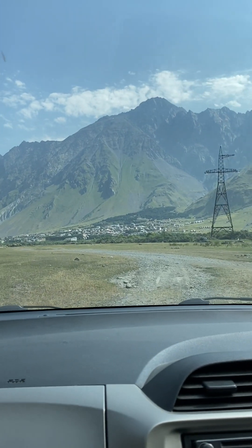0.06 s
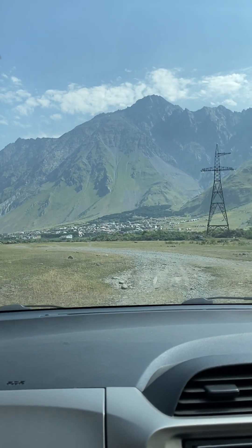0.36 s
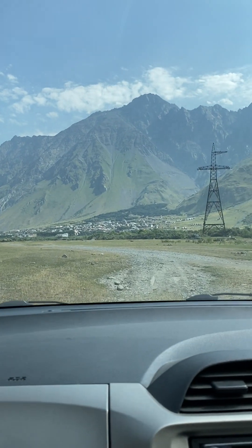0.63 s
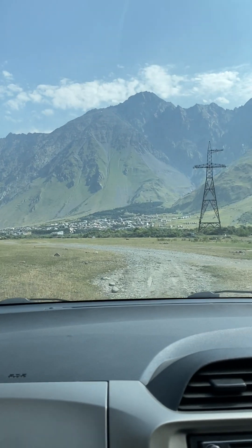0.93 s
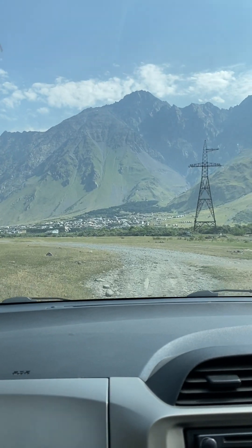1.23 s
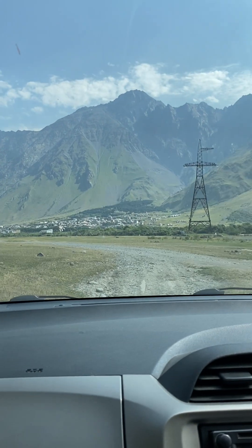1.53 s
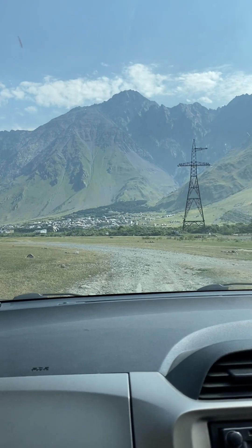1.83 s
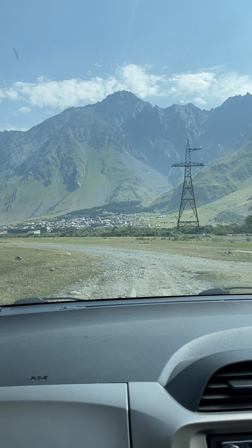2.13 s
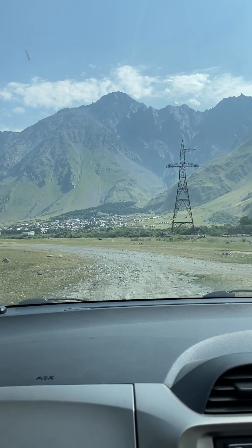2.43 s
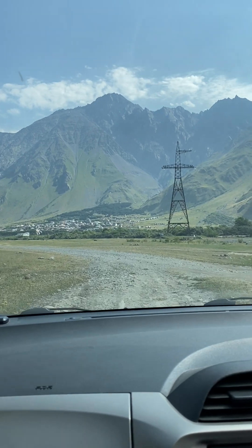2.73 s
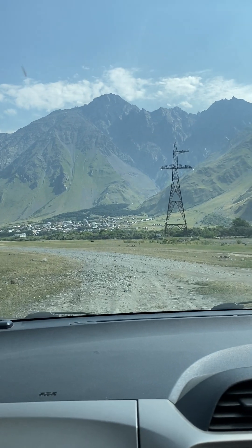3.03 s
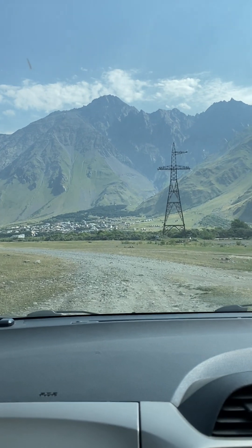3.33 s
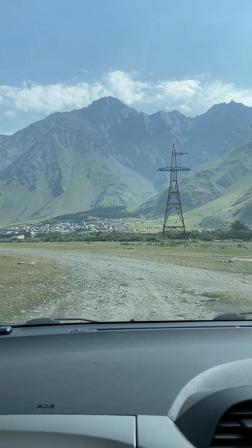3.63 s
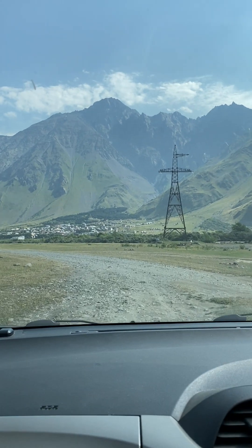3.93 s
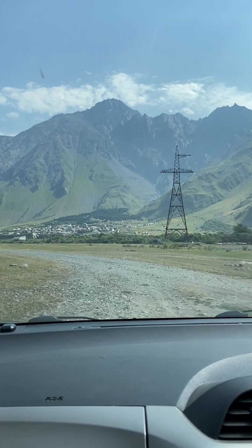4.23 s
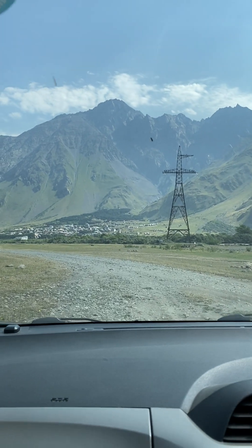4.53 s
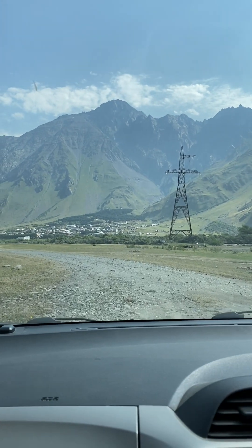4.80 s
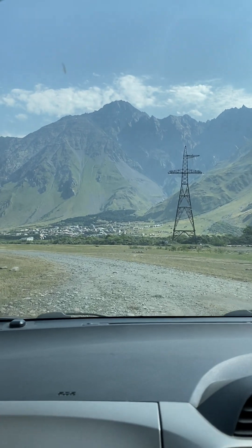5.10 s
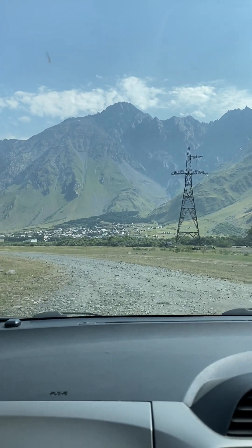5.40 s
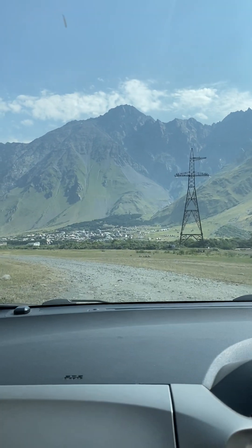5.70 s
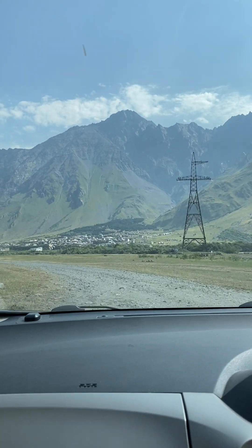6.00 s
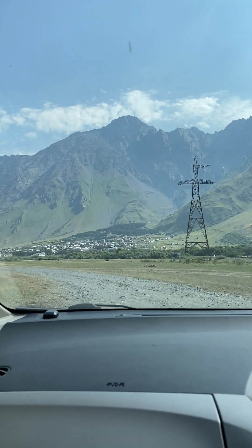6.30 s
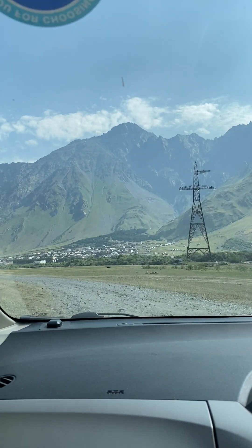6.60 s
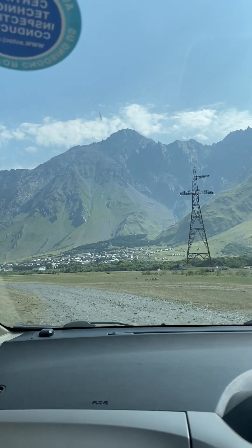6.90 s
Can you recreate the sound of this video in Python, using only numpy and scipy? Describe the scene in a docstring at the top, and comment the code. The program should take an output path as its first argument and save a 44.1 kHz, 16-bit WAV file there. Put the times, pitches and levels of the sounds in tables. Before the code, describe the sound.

A car creeps along a rough gravel track, heard from inside as low rumble, engine drone, stone knocks, jolts and small rattles.

```python
"""Inside a car rolling slowly along a gravel track.
From the start the wheels shake the cabin into a deep boom over the engine's hum and thin whines; gravel
crunches under the tyres and stones knock through the floor. A soft hiss fades and stops near 2.3 s, as
jolts ring the body. Plastic trim ticks and squeaks; brief rustles follow. A faint, high squeal passes
at 4.2-4.6 s, then the track turns rougher and the boom grows."""
import sys
import numpy as np
from scipy import signal
from scipy.fft import rfft, irfft, next_fast_len
from scipy.io import wavfile
from scipy.ndimage import uniform_filter1d

SR = 44100
rng = np.random.default_rng(int(sys.argv[2]) if len(sys.argv) > 2 else 0)


def file_out(sig):
    """Save sig as 16-bit WAV at sys.argv[1]."""
    # one column per channel
    cols = np.atleast_2d(sig).T
    # limit, then scale
    lim = np.clip(cols, -1, 1)
    pcm = np.round(lim * 32767).astype(np.int16)
    wavfile.write(sys.argv[1], SR, pcm)


N = 306495

# spectrum of hiss and rustles: freq_hz, density_db
HISS_SPECTRUM = [(700, -10.5), (1500, 1.5), (2400, 1), (3700, 2), (4800, 3), (6000, -1), (8000, -5.5),
                 (10500, -3.5), (13000, -9), (15800, -15)]


def from_db(db):
    """Decibels to gain."""
    return 10 ** (np.asarray(db) / 20)


def unit_rms(x):
    """Scale to rms 1."""
    return x / np.sqrt(np.mean(x ** 2) + 1e-20)


def unit_burst(x):
    """Scale a short stereo sound to unit power over 23 ms."""
    return x / np.sqrt(np.sum(x ** 2) / 2 / (.023 * SR))


def evened(x, span_s):
    """Flatten swells slower than the span."""
    power = uniform_filter1d(np.mean(x ** 2, axis=0), max(int(span_s * SR), 2))
    return x / np.sqrt(power + 1e-9)


def curves(rows):
    """Interpolate each column after time_s to N samples."""
    time_s, *columns = np.transpose(rows)
    return [np.interp(np.arange(N) / SR, time_s, column) for column in columns]


def at_hz(points, hz):
    """Read a table on a log-frequency axis."""
    freq_hz, values = np.transpose(points)
    return np.interp(np.log(hz + 1), np.log(freq_hz + 1), values)


def bins_hz(size):
    """Frequencies of a real spectrum."""
    return np.arange(size // 2 + 1) * SR / size


def band(hz, width_oct):
    """Band edges around a pitch, at least 0.2 octave apart."""
    ratio = 2 ** (max(width_oct, .2) / 2)
    return [hz / ratio, hz * ratio]


def butter(x, hz, kind, order=2):
    """Causal Butterworth filter."""
    sos = signal.butter(order, np.clip(hz, 10, .45 * SR), kind, fs=SR, output="sos")
    return signal.sosfilt(sos, x + 1e-18)


def drift(rate_hz):
    """Slow random curve, rms 1."""
    hop = 40
    pole = np.exp(-2 * np.pi * rate_hz * hop / SR)
    noise = rng.standard_normal(N // hop + 2002)
    slow = signal.lfilter([1], [1, -2 * pole, pole * pole], noise)[2000:]
    return np.interp(np.arange(N) / hop, np.arange(len(slow)), unit_rms(slow))


def add(out, start_s, sound):
    """Mix a sound in at a time."""
    i = int(np.clip(start_s * SR, 0, N - 1))
    out[:, i:i + sound.shape[-1]] += sound[..., :N - i]


def grains(per_s, spread_db):
    """Two trains of random clicks of uneven size."""
    sizes = from_db(spread_db * np.minimum(rng.exponential(1, (2, N)), 4))
    signs = rng.choice([-1, 1], (2, N))
    return unit_rms(sizes * signs * (rng.random((2, N)) < per_s / SR))


def contact(crack_t60_s, tail_t60_s, tail_db, width=.4):
    """A short stereo crack, then dense cabin reflections dying away."""
    t = np.arange(SR // 5) / SR
    decay = from_db(-60 * t / crack_t60_s) + from_db(tail_db - 60 * t / tail_t60_s)
    attack = (1 - np.exp(-t / 0.002)) ** 2
    mid, side = rng.standard_normal((2, len(t))) * decay * attack
    return mid + width * side * np.array([[1], [-1]])


def cabin_field(pair, spectrum):
    """Colour two unrelated signals and mix them to left and right, alike in the bass; rms 1."""
    # left-right likeness: freq_hz, coherence
    likeness = [(125, 1), (250, .99), (500, 0.78), (1000, 0.66), (2000, 0.72), (4000, 0.65), (8000, 1),
                (14000, 0.31)]
    size = next_fast_len(N + SR // 2)
    hz = bins_hz(size)
    rolloff = np.sqrt(1 + (hz / (2 * spectrum[-1][0])) ** 8)
    mid, side = rfft(pair, size) * from_db(at_hz(spectrum, hz)) / rolloff
    coherence = np.clip(at_hz(likeness, hz), 0, 1)
    stereo = np.sqrt(1 + coherence) * mid + np.sqrt(1 - coherence) * side * [[1], [-1]]
    return unit_rms(irfft(stereo, size)[:, :N])


def boom(lift_db):
    """The sprung body pumps the cabin air, which booms in its lowest modes."""
    # body shake from track roughness: time_s, level_db
    shake = [(0.0, -27.5), (0.11, -28.5), (4.63, -29), (4.69, -24.5), (5.4, -25.5), (5.96, -26),
             (6.05, -27), (6.9, -23)]
    # cabin air modes: freq_hz, density_db
    spectrum = [(22, -13), (32, -1.5), (41, -8.5), (55, 1), (65, 1), (76, -2), (88, -9.5), (105, -19.5),
                (140, -31)]
    shake_db, = curves(shake)
    air = evened(cabin_field(rng.standard_normal((2, N)), spectrum), span_s=0.058)
    return from_db(shake_db + lift_db + 0.26 + 0.57 * drift(5.9)) * air


def bumps():
    """Bumps and crests swell or dip boom and rumble, in dB; the springs' rebound reverses each."""
    # bumps and crests: time_s, boom_db, rumble_db
    crossings = [(0.334, -1, 4.5), (0.57, -1.5, 2), (0.85, 1, 1.5), (1.641, 3, 3.5), (2.0, 0.5, 1),
                 (2.22, -2, 1), (2.52, 3, 6.5), (3.51, 3.5, -5.5), (3.831, -4, -2), (4.011, 6.5, 6),
                 (4.28, 1.5, 2), (4.76, 4.5, 2), (5.18, 3.5, -2), (5.329, 5.5, 3), (5.421, 7, -2.5),
                 (5.47, 0.5, 6.5), (5.7, -1.5, -4.5), (5.96, 1, 4.5), (6.231, 3, 2), (6.329, -2, 3.5),
                 (6.619, 4, 0.5), (6.78, 0.5, -6.5)]
    half_length_s, rebound_s, rebound_share = 0.073, 0.087, 0.43
    t, lift_db = np.arange(N) / SR, np.zeros((2, N))
    for time_s, boom_db, rumble_db in crossings:
        press = np.exp(-((t - time_s) / half_length_s) ** 2)
        rebound = np.exp(-((t - time_s - rebound_s) / half_length_s) ** 2)
        lift_db += np.outer([boom_db, rumble_db], press - rebound_share * rebound)
    return lift_db


def thumps():
    """A big stone presses a tyre in and shoves the cabin air: a few heavy, low cycles."""
    # big stones: start_s, peak_db, pitch_hz
    hits = [(0.315, -15, 57.9), (1.576, -17.5, 59.04), (2.286, -19, 114), (2.316, -18.5, 100),
            (3.992, -17.5, 68.2), (4.146, -27.5, 193), (5.26, -18, 111.5), (5.335, -11.5, 64),
            (6.86, -16, 53.1)]
    rise_cycles = 0.93
    out, t = np.zeros((2, N)), np.arange(SR // 4) / SR
    for start_s, peak_db, pitch_hz in hits:
        age = t * pitch_hz / rise_cycles
        envelope = from_db(peak_db) * (age * np.exp(1 - age)) ** 2
        add(out, start_s, envelope * np.sin(2 * np.pi * pitch_hz * t))
    return out


def engine():
    """The first two firing orders of an engine at low speed, wavering a little."""
    # light, changing load: time_s, firing_hz, level_db
    load = [(0, 76.1, -27), (0.6, 78.17, -35.5), (1.1, 77.3, -33), (1.4, 72.46, -31), (1.75, 75.06, -40),
            (2.15, 72, -41), (2.5, 78.94, -28.5), (3.0, 79.9, -33), (3.5, 79.2, -32.5), (3.8, 78.53, -38.5),
            (4.45, 75, -37), (4.8, 73, -24), (5.3, 71.91, -35.5), (5.85, 73, -22), (6.2, 71.63, -34),
            (6.75, 70.33, -26.5)]
    firing_hz, level_db = curves(load)
    phase = 2 * np.pi * np.cumsum(firing_hz * (1 + 0.0039 * drift(3.5))) / SR
    orders = np.sin(phase) + from_db(-16) * np.sin(2 * phase)
    return from_db(level_db + 2.0 * drift(5.9)) * orders


def tyres(rumble_db, crunch_db):
    """Treads thud over the stones; small gravel grinds in clumps and drums through the floor."""
    # spectra of treads, gravel and floor pan: freq_hz, density_db
    tread_spectrum = [(70, -7.5), (105, 3.5), (135, 4), (175, -4.5), (215, -8.5), (260, -18), (320, -17.5),
                      (390, -29.5), (455, -26.5), (560, -26.5), (700, -34.5), (1200, -57)]
    gravel_spectrum = [(350, 1.5), (560, 0), (720, 4.5), (900, 0.5), (1200, 1), (1450, -4.5), (1650, -3.5),
                       (1900, -6), (2150, -9), (2400, -9.5), (2800, -10.5), (4000, -21.5), (7000, -35.5)]
    floor_spectrum = [(260, -8), (335, 2.5), (390, -3.5), (455, 4), (540, -17), (900, -29)]
    thuds = evened(cabin_field(grains(per_s=320, spread_db=1.0), tread_spectrum), span_s=0.11)
    grit = grains(per_s=1500 * from_db(2 * drift(30)), spread_db=0.5)
    wash = from_db(-1.5) * rng.standard_normal((2, N))
    clumps = from_db(crunch_db - 0.16 + 2.0 * drift(19))
    crunch = clumps * evened(cabin_field(grit + wash, gravel_spectrum), span_s=0.23)
    drumming = from_db(crunch_db - 2.5) * cabin_field(grains(per_s=300, spread_db=0.5), floor_spectrum)
    rumble = from_db(rumble_db + 0.7 + 2.0 * drift(20)) * thuds
    return rumble + crunch + drumming


def jolts():
    """A wheel drops into a rut, rings the panels and shakes loose parts; soft landings sound duller."""
    # suspension jolts: start_s, level_db, cutoff_hz
    landings = [(0.927, -34.5, 376), (1.92, -36.5, 516), (1.966, -37.5, 480), (2.24, -30.5, 617.3),
                (2.266, -34.5, 740), (2.278, -31.5, 650), (2.286, -22, 340), (2.319, -32, 280),
                (3.072, -40, 520), (3.432, -35.5, 650), (3.931, -36.5, 496), (3.969, -35, 396),
                (4.551, -33.5, 450), (4.738, -36, 700), (5.028, -36, 526), (5.897, -33, 422.1),
                (6.27, -39.5, 450), (6.462, -35.5, 460), (6.49, -35.5, 416.2), (6.543, -27, 613),
                (6.559, -28.5, 382), (6.896, -34.5, 600)]
    # body panel modes: mode_hz, mode_db, t60_s
    panel_modes = [(107, -2.5, 0.17), (145, 6.5, 0.028), (218, -1.5, 0.06), (258, -2.5, 0.053),
                   (350, -6.5, 0.085), (447, -8, 0.032), (726, -7.5, 0.04)]
    rattle_db, rattle_t60_s, rattle_per_s, rattle_band_hz = -10, 0.093, 670, [300, 1220]
    out, t = np.zeros((2, N)), np.arange(SR // 3) / SR
    for start_s, level_db, cutoff_hz in landings:
        ring = np.zeros(len(t))
        for k, (mode_hz, mode_db, t60_s) in enumerate(panel_modes):
            envelope = rng.normal(1, .2) * from_db(mode_db - 60 * t / t60_s)
            ring += (-1) ** k * envelope * np.sin(2 * np.pi * mode_hz * rng.normal(1, .05) * t)
        ring = butter(ring, [cutoff_hz / 3, cutoff_hz], "band")
        ring *= from_db(level_db - 0.5) / np.abs(ring).max()
        clicks = rng.standard_normal(len(t)) * (rng.random(len(t)) < rattle_per_s / SR)
        hit = contact(crack_t60_s=.02, tail_t60_s=.05, tail_db=-9, width=.3)
        rattle = signal.oaconvolve(clicks[None], hit, axes=1)[:, :len(t)]
        rattle = unit_rms(butter(rattle, rattle_band_hz, "band"))
        rattle = butter(rattle, cutoff_hz, "low", order=1)
        add(out, start_s, ring + from_db(level_db + rattle_db - 60 * t / rattle_t60_s) * rattle)
    return out


def stones():
    """Stones snap from under the tyres and may bounce; the floor pan dulls each crack and rings."""
    # stone strikes: start_s, level_db, pitch_hz, width_oct, bounce_gain
    strikes = [(0.29, -59, 1090, 0.75, 0.7), (0.325, -60, 1080, 1.3, 0.3), (0.496, -62, 1870, 0.95, 0.4),
               (0.731, -54, 1080, 1.2, 0.1), (0.853, -59, 1000, 0.79, 0.2), (0.898, -53.5, 1260, 1.7, 0.3),
               (0.996, -59, 1170, 2.5, 0.1), (1.176, -56, 1210, 1.1, 0.2), (1.189, -53.5, 1280, 1.4, 0.34),
               (1.335, -48.5, 1270, 1.24, 0.2), (1.91, -49.5, 1610, 3, 0), (2.046, -62, 1150, 1.4, 0.6),
               (2.227, -47.5, 1116, 6.5, 0.6), (2.238, -58, 1400, 2.7, .7), (2.354, -63, 1050, 0.99, 0.05),
               (2.458, -60, 1190, 0.74, 0), (2.714, -61.5, 880, 2.63, 0.1), (3.404, -60, 990, 1.2, 0),
               (3.421, -52, 1080, 0.7, 0.8), (3.443, -54.5, 1110, 1.2, 0.05), (3.529, -61, 1180, 0.74, 0.3),
               (3.926, -60, 1300, 2.1, 0.1), (3.968, -59, 760, 1.2, 0.15), (4.065, -54.5, 1910, 1.7, 0.5),
               (4.178, -59.5, 1030, 2.4, 0.06), (4.328, -62, 750, 0.64, 0), (4.65, -58.5, 760, 0.77, 0.3),
               (4.737, -51, 1100, 3.6, 0.2), (4.801, -56.5, 900, 1.3, 0.16), (4.846, -50.5, 870, 0.91, 0),
               (5.031, -62.5, 870, 1.6, 0), (5.654, -63.5, 1400, 1.6, 0), (6.205, -55.5, 734, 0.85, 0.34),
               (6.258, -61, 890, 1, 0.1), (6.541, -52.5, 1140, 0.98, 0.2), (6.898, -52, 596, 1.2, 0.6)]
    bounce_s = 0.014
    out = np.zeros((2, N))
    for start_s, level_db, pitch_hz, width_oct, bounce_gain in strikes:
        for delay_s, gain in ((0, 1), (bounce_s, bounce_gain)):
            hit = contact(crack_t60_s=.024, tail_t60_s=.07, tail_db=-9)
            crack = unit_burst(butter(hit, band(pitch_hz, width_oct), "band"))
            crack += from_db(-17) * unit_burst(butter(hit, [350, 1900], "band"))
            pan_ring = from_db(-4.5) * butter(crack, band(hz=2150, width_oct=.2), "band")
            clack = butter(crack + pan_ring, 2600, "low", order=4)
            add(out, start_s + delay_s, gain * from_db(level_db + 1.4) * clack)
    return out


def trim_ticks():
    """Plastic panels snap drily against each other, barely ring and touch once more."""
    # trim snaps: start_s, level_db, pitch_hz, width_oct
    snaps = [(1.899, -52.5, 2700, 0.99), (2.225, -52, 3220, 1.3), (2.236, -50, 3030, 1.1),
             (2.252, -54, 3150, 0.52), (2.348, -60.5, 3380, 1.1), (2.512, -57, 3760, 0.79),
             (2.525, -72, 10200, 0.41), (2.661, -58, 2830, 1.5), (2.834, -61, 3850, 0.32),
             (2.962, -66.5, 4380, 0.9), (3.046, -60.5, 4460, 0.81), (3.929, -60, 3243, 1.1),
             (3.952, -61, 4550, 0.85), (4.067, -64, 4200, 0.79), (4.154, -56.5, 2360, 0.42),
             (4.183, -58.5, 2650, 0.57), (4.258, -65.5, 2980, 1.3), (4.737, -51.5, 2140, 0.55),
             (4.736, -65, 4720, .8), (4.913, -64, 3330, 1.1), (5.026, -58, 2117, 0.27),
             (5.059, -65, 6418, 1.28), (5.291, -61, 2650, 0.71), (5.349, -65.5, 3880, 3.7),
             (5.362, -60, 3000, 0.91), (5.374, -64, 3126, 1.4), (5.485, -56, 2880, 1.2),
             (5.647, -60, 3500, 1.1), (5.755, -59.5, 2460, 0.59), (6.016, -61, 5100, 0.61),
             (6.017, -66, 10000, .6), (6.151, -67, 5360, 0.59), (6.257, -66, 3900, 1.7),
             (6.401, -57, 2330, 0.61), (6.466, -55.5, 3760, 1.1), (6.531, -67, 5660, .4),
             (6.542, -60.5, 4640, 0.51), (6.692, -62, 3820, 0.48), (6.759, -64, 3700, 1.1),
             (6.765, -50.5, 2179, 1.6), (6.767, -65, 5300, 0.28), (6.768, -69, 10300, 0.46),
             (6.816, -71, 5360, 0.51)]
    ring_t60_s = .04
    out, t = np.zeros((2, N)), np.arange(SR // 5) / SR
    for start_s, level_db, pitch_hz, width_oct in snaps:
        for delay_s, touch_db in ((0, 0), (rng.uniform(.005, .014), rng.normal(-8, 2))):
            hit = contact(crack_t60_s=.017, tail_t60_s=.05, tail_db=-8)
            tick = unit_burst(butter(hit, band(pitch_hz, width_oct), "band"))
            tick += from_db(-17.5) * unit_burst(butter(hit, 3000, "high"))
            modes_hz = rng.uniform(*band(pitch_hz, 0.7 * width_oct), size=(4, 1))
            ring = np.sin(2 * np.pi * (modes_hz * t + rng.random((2, 4, 1)))).sum(axis=1)
            tick += from_db(-9) * unit_burst(ring * from_db(-60 * t / ring_t60_s))
            add(out, start_s + delay_s, from_db(level_db + touch_db - 7) * tick)
    return out


def trim_squeaks():
    """Trim slips for an instant and sings in a narrow band."""
    # trim rubbing: start_s, length_s, pitch_hz, level_db
    slips = [(0.321, 0.01, 13350, -41), (0.326, 0.022, 12900, -47), (2.273, 0.056, 3320, -60),
             (2.543, 0.029, 3030, -65), (2.548, 0.02, 11000, -70), (2.937, 0.041, 3370, -68),
             (5.449, 0.022, 2080, -58.5)]
    out = np.zeros((2, N))
    for start_s, length_s, pitch_hz, level_db in slips:
        size = int(length_s * SR)
        slip = butter(rng.standard_normal(size), [pitch_hz / 1.025, pitch_hz * 1.025], "band")
        add(out, start_s, from_db(level_db) * unit_rms(slip) * np.hanning(size))
    return out


def hiss():
    """A bright, fluttering rush fades ever faster, then stops, leaving faint air."""
    start_db, fade_db_per_s2, end_s, stop_db_per_s, air_db = -57.3, 1.9, 2.254, 153, -79
    t = np.arange(N) / SR
    fading_db = start_db - fade_db_per_s2 * t ** 2 - stop_db_per_s * np.maximum(t - end_s, 0)
    gain = np.hypot(from_db(fading_db + 1.8 * drift(15)), from_db(air_db + 0.88 * drift(6.9)))
    return gain * cabin_field(rng.standard_normal((2, N)), HISS_SPECTRUM)


def pebbles(crunch_db, per_s):
    """Small pebbles click one by one under the treads, each at its own pitch."""
    out = np.zeros((2, N))
    for when, pitch, size in rng.random((int(per_s * N / SR), 3)):
        hit = contact(crack_t60_s=.016, tail_t60_s=.05, tail_db=-11)
        clack = unit_burst(butter(hit, band(hz=700 * 4 ** pitch, width_oct=1.1), "band"))
        add(out, when * N / SR, from_db(-11.5 + 11 * size - 7 * pitch) * clack)
    return from_db(crunch_db) * out


def grit_spray(crunch_db, per_s):
    """Fine grit ticks against the wheel arches in clumps, smeared by the cabin."""
    # grit on the arches: freq_hz, density_db
    spectrum = [(900, -8.5), (1500, -2.5), (2300, 7), (3200, -3.5), (4500, -5.5), (5600, 0), (7500, -23.5),
                (11000, -15.5), (15000, -23)]
    clicks = grains(per_s=per_s * from_db(4.5 * drift(14)), spread_db=2.5)
    smear = contact(crack_t60_s=0.021, tail_t60_s=0.069, tail_db=-4.5, width=1.0)
    ticks = signal.oaconvolve(clicks, smear, axes=1)[:, :N]
    return from_db(crunch_db - 17) * cabin_field(ticks, spectrum)


def rustles():
    """Dense, fine clicks swell quickly, sag a little and stop."""
    # bright rustles: start_s, length_s, level_db
    bursts = [(2.496, 0.054, -69), (3.415, 0.096, -70), (3.584, 0.37, -75), (3.921, 0.17, -64),
              (4.537, 0.16, -75), (4.787, 0.065, -70.5), (5.048, 0.071, -74.5), (5.336, 0.068, -75),
              (5.614, .06, -72.5), (5.99, .04, -71.5), (6.834, 0.083, -70.5)]
    attack_s, release_s, sag_db_per_s = 0.027, 0.039, 9
    t, envelope = np.arange(N) / SR, np.zeros(N)
    for start_s, length_s, level_db in bursts:
        age_s = t - start_s
        gate = np.clip(1 + np.minimum(age_s / attack_s, (length_s - age_s) / release_s), 0, 1)
        envelope += gate * from_db(level_db - sag_db_per_s * np.maximum(age_s, 0))
    flutter = from_db(2.0 * drift(35))
    return envelope * flutter * cabin_field(grains(per_s=1800, spread_db=-0.5), HISS_SPECTRUM)


def whines():
    """Thin, nearly steady tones, as of a small electric motor."""
    # cabin whines: pitch_hz, level_db
    tones = [(1516, -72.5), (2123, -85.5), (3757, -87)]
    out = np.zeros(N)
    for pitch_hz, level_db in tones:
        phase = 2 * np.pi * np.cumsum(pitch_hz * (1 + .002 * drift(12))) / SR
        out += from_db(level_db + 0.99 * drift(0.95)) * np.sin(phase)
    return out


def squeal():
    """Two spots rub and sing very high, in faint, broken scraps of wandering pitch."""
    # rubbing contour: time_s, base_hz, level_db
    contour = [(4.15, 9840, -120), (4.18, 9950, -81), (4.24, 11600, -80), (4.37, 11100, -78),
               (4.43, 12150, -79), (4.5, 10400, -81.5), (4.58, 11160, -87.5), (4.7, 11010, -120)]
    base_hz, level_db = curves(contour)
    out = np.zeros(N)
    for ratio, spot_db in ((1.01, -4), (.93, -8)):
        phase = 2 * np.pi * np.cumsum(base_hz * ratio * (1 + .025 * drift(120))) / SR
        scraps = np.clip(.5 + drift(35), 0, 1)
        rough_tone = drift(170) * np.sin(phase) + drift(170) * np.cos(phase)
        out += scraps * from_db(level_db + spot_db) * rough_tone
    return out


def cabin_echoes(x):
    """Hard surfaces close by add early echoes that ripple the spectrum above the bass."""
    # windscreen, dashboard and roof echoes: delay_s, gain
    echoes = [(.0013, -0.022), (.0037, -0.17), (.0061, 0.051), (.0097, -0.16), (0.013, 0.045)]
    out, bright = x.copy(), butter(x, 390, "high")
    for delay_s, gain in echoes:
        add(out, delay_s, gain * bright)
    return out


def scene():
    """Road, engine and trim, heard from the front seat."""
    # tyres rolling: time_s, rumble_db, crunch_db
    rolling = [(0.0, -36.5, -55.5), (2.52, -41.5, -56.5), (2.98, -40.5, -58.5), (4.07, -37, -58.5),
               (4.32, -37.5, -62.5), (5.27, -35, -58.5), (5.86, -38.5, -61.5), (6.51, -35, -60.5),
               (6.9, -35, -57.5)]
    rumble_db, crunch_db = curves(rolling)
    boom_lift_db, rumble_lift_db = bumps()
    bumpy_crunch_db = crunch_db + 0.12 * rumble_lift_db
    road = boom(boom_lift_db) + tyres(rumble_db + rumble_lift_db, bumpy_crunch_db)
    road += grit_spray(bumpy_crunch_db, per_s=79) + stones() + jolts() + thumps()
    machinery = engine() + whines()
    inside = trim_ticks() + trim_squeaks() + hiss() + rustles()
    return squeal() + machinery + cabin_echoes(road + inside + pebbles(crunch_db, per_s=17))


def record(dry):
    """Two spaced microphone ports differ in level and phase; the deepest bass and the top are cut."""
    # port balance: freq_hz, left_minus_right_db
    balance = [(60, -.5), (130, -0.9), (380, -4), (700, -4), (1290, .5), (2400, -1), (8000, 0)]
    # port phase: freq_hz, left_lead_rad
    lead = [(100, 0), (700, .1), (2150, .3), (3000, .9), (3800, .6), (5100, .6), (6200, 1.7), (7400, 3.1),
            (10300, 6.3), (13600, 9.4), (16000, 12.4)]
    low_cut_hz, high_cut_hz = 20.24, 15800
    size = next_fast_len(N + SR // 2)
    hz, sides = bins_hz(size), np.array([[.5], [-.5]])
    ports = from_db(sides * at_hz(balance, hz)) * np.exp(1j * sides * at_hz(lead, hz))
    heard = irfft(rfft(dry, size) * ports, size)[:, :N]
    heard = butter(heard, low_cut_hz, "high", order=6)
    return signal.sosfilt(signal.ellip(10, .1, 80, high_cut_hz, fs=SR, output="sos"), heard)


dry = scene()
out = record(dry)
file_out(out)
```